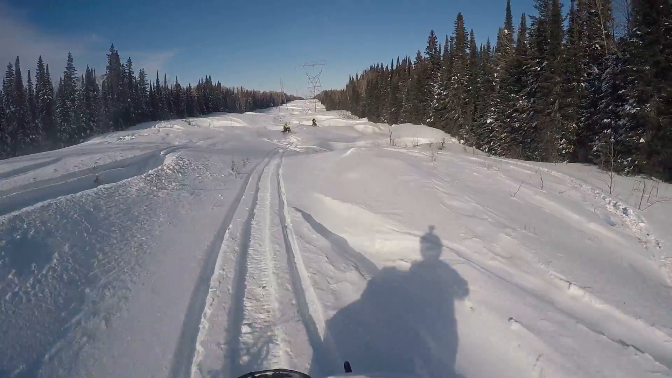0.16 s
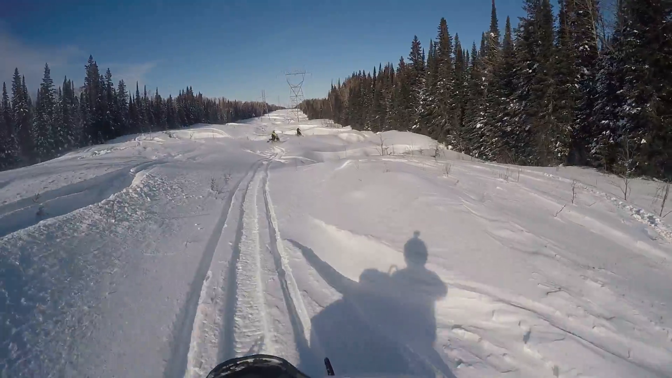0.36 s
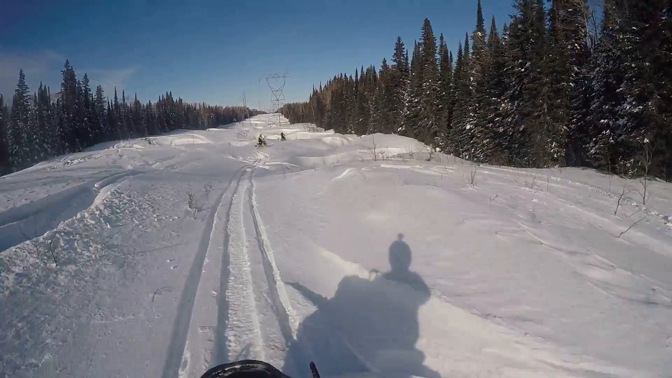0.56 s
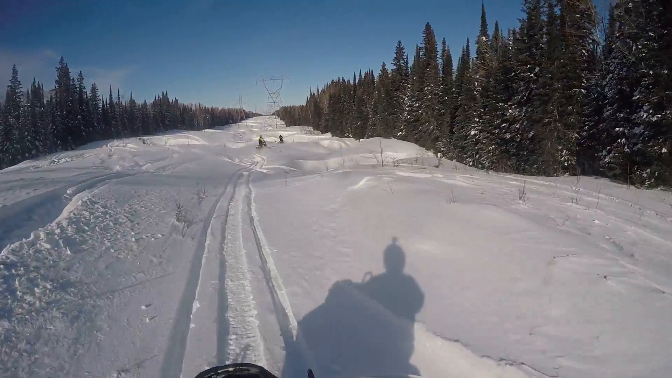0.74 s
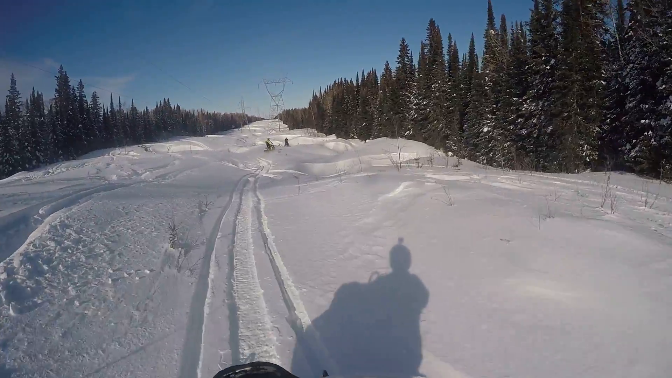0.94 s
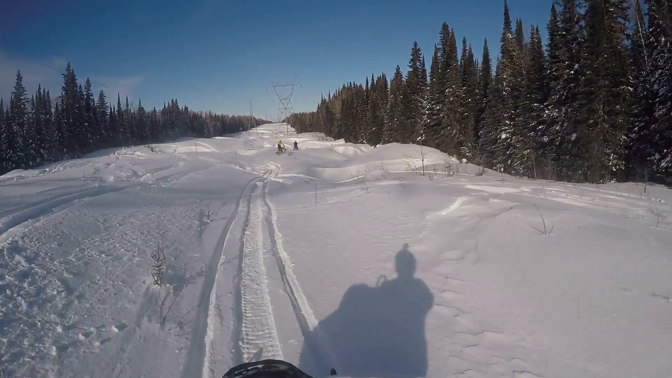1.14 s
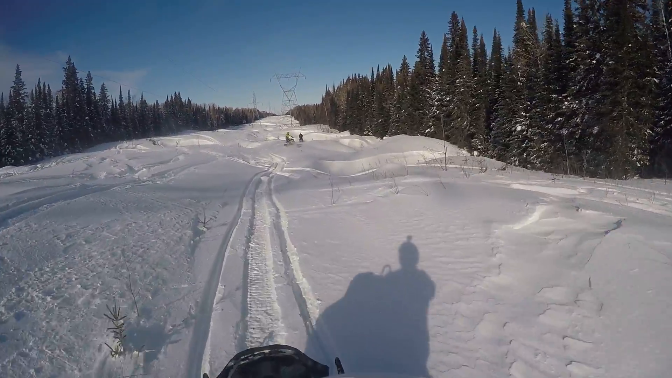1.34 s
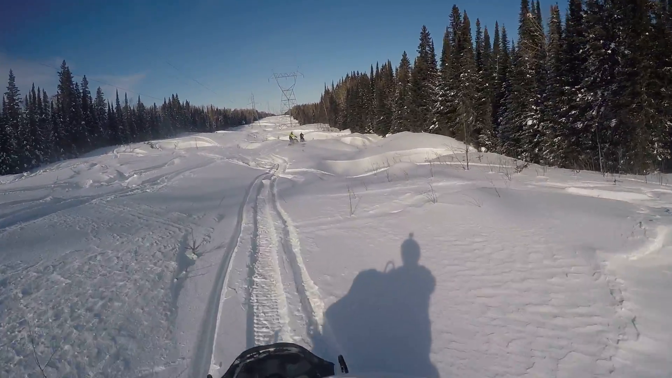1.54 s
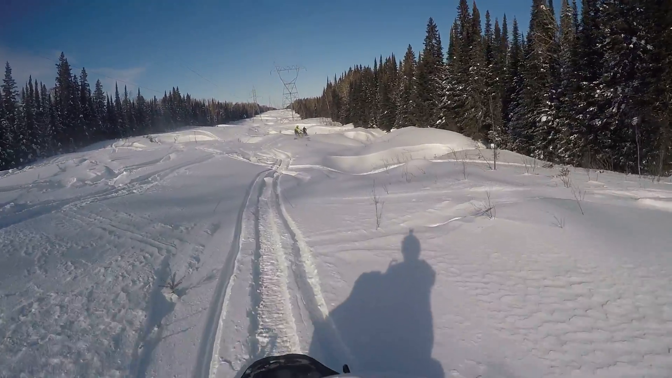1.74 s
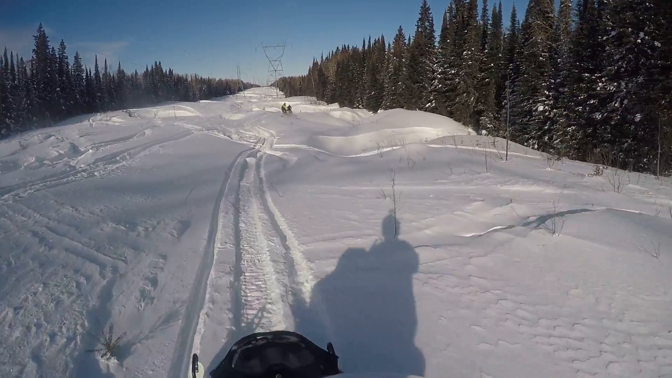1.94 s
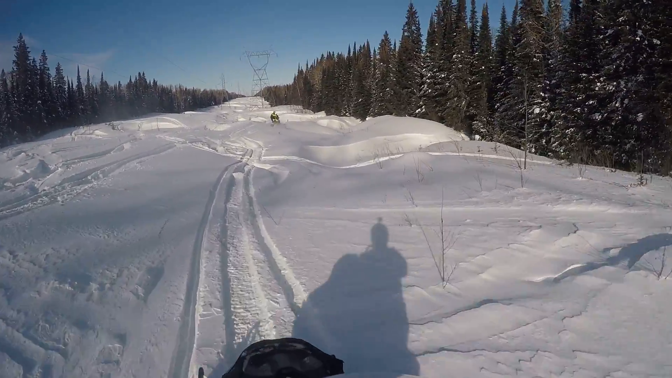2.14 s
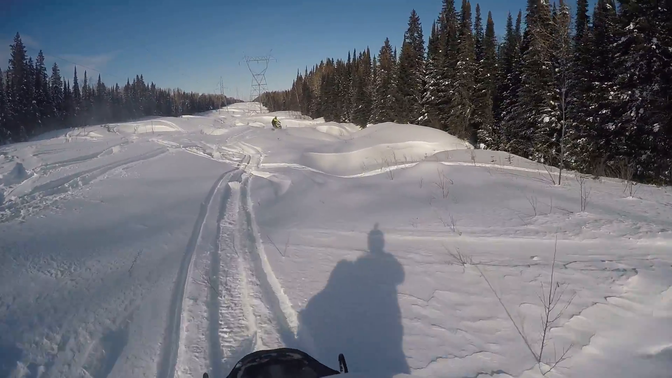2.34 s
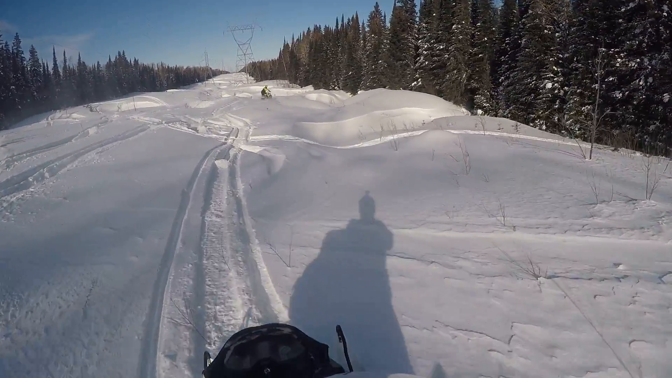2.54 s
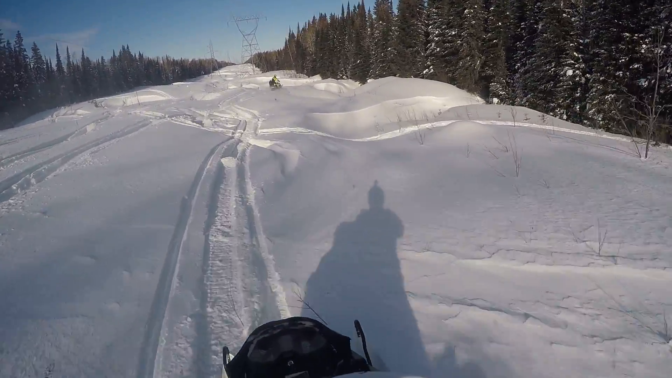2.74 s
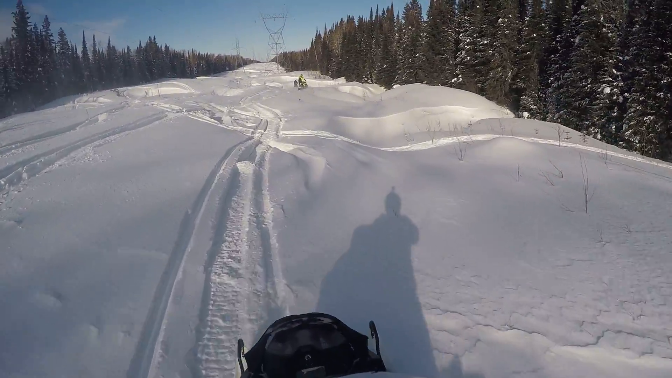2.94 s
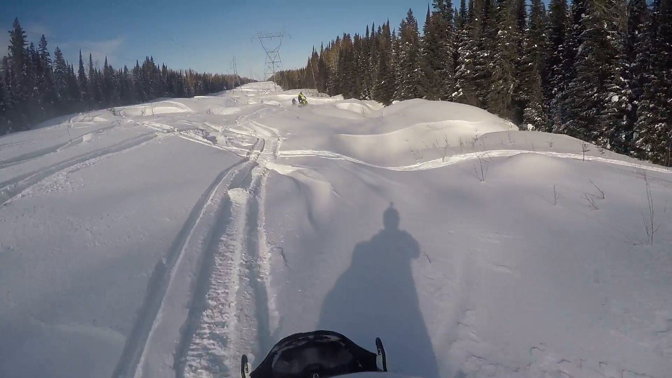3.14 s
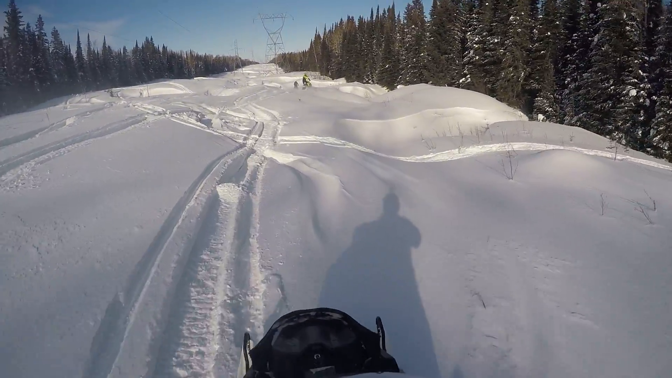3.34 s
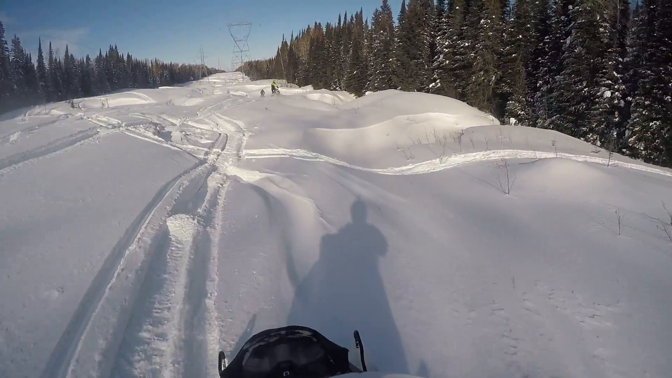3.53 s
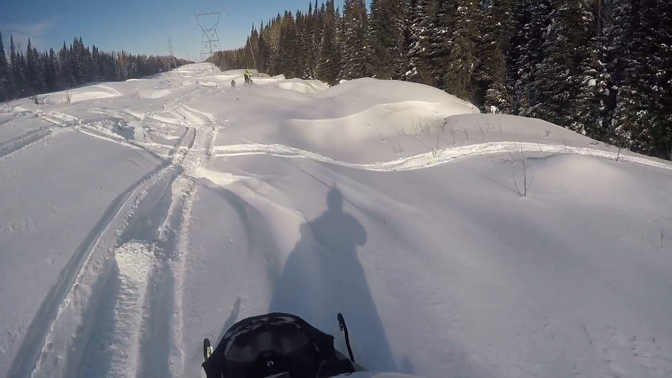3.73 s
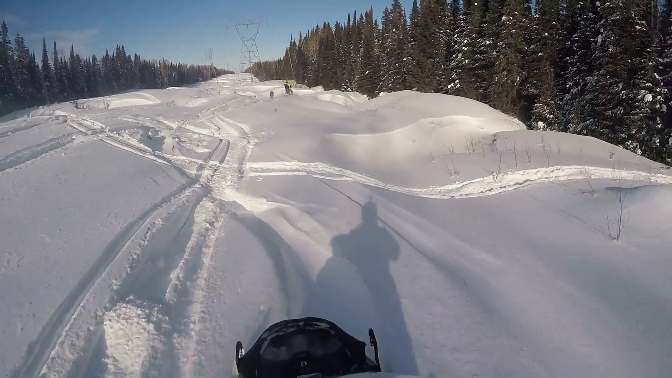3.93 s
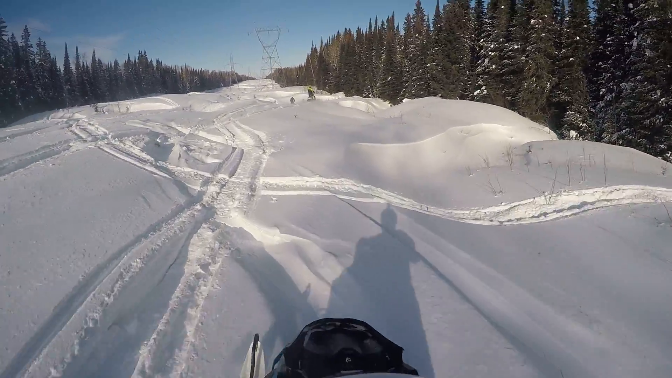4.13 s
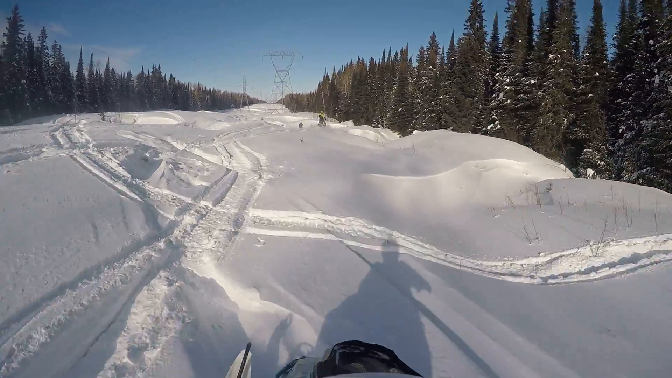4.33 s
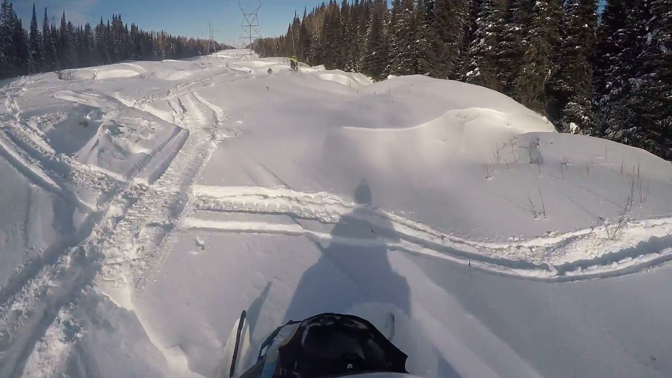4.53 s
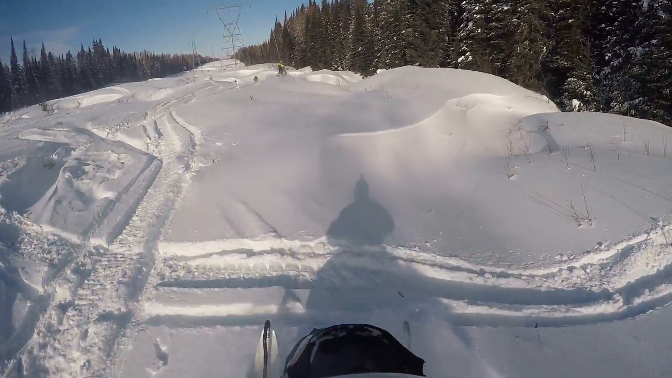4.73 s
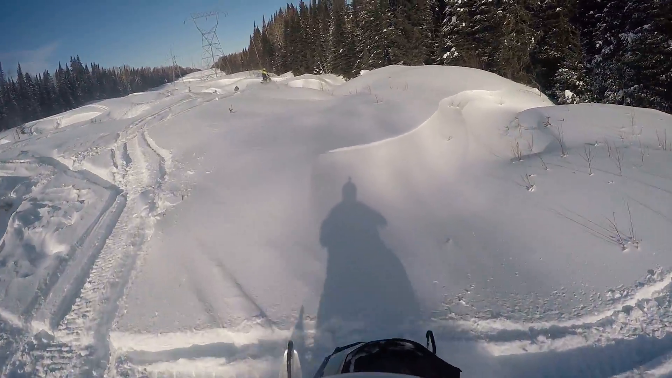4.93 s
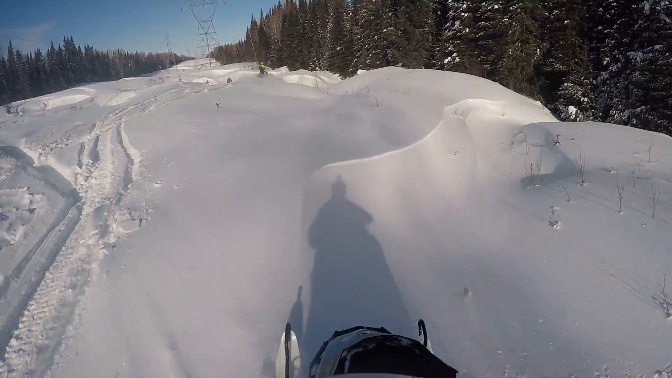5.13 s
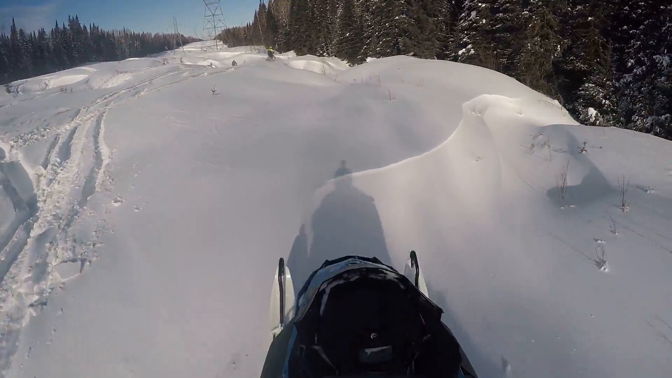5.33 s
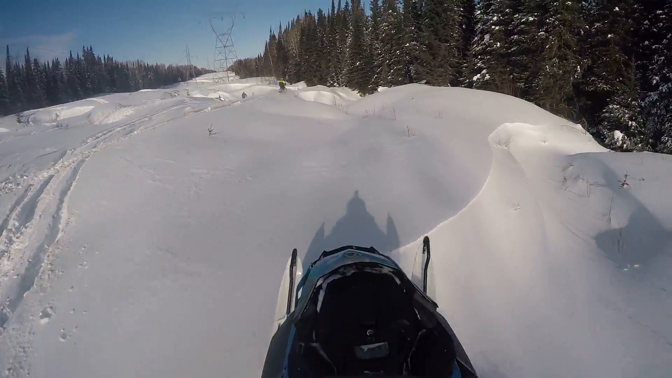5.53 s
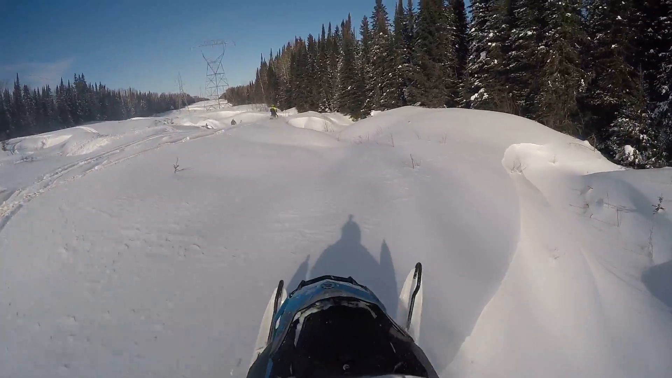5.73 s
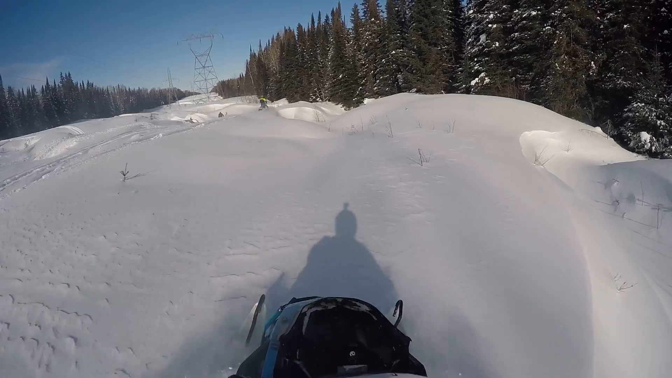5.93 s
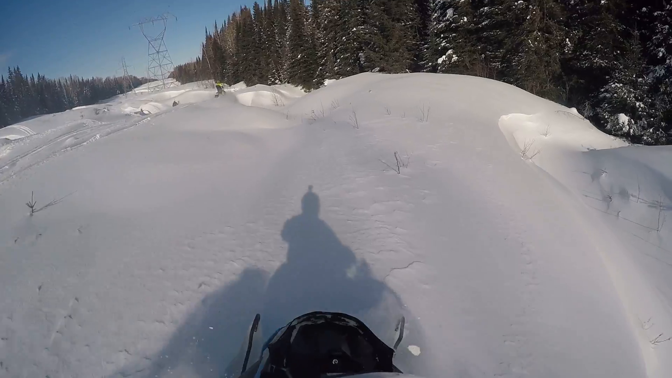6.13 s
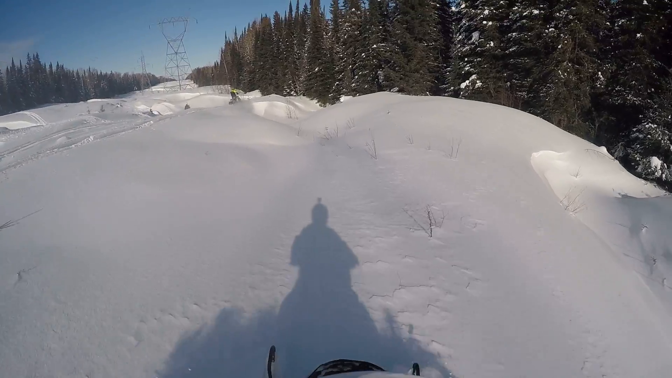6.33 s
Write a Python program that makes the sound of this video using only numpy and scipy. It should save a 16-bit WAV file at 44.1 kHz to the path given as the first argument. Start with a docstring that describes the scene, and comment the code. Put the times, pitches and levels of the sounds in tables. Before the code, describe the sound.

A rough, buzzing snowmobile engine starts mid-throttle, eases, then gives a run of quick barking blips with droning falls between them. Belt and snow hiss, rubber track hum and a loose, rattling hood surround it. A sharp knock comes before the big rev, which howls for under half a second and winds down. Dry outdoor sound from a microphone worn by the rider, buffeted by wind.

```python
"""Snowmobile in deep snow

Heard from the rider's seat, the engine answers short throttle bursts, then one hard rev.
Sine harmonics make the exhaust's boom, bark and howl; one pulse a firing makes its rasp and drone.
Pulses and noise shake the casing, sines make the track's hum, and decaying rings make the chassis ticks.
Filtered noise makes the belt and snow hiss, the wind on the microphone and a thin high fizz."""
import sys
import numpy as np
from scipy.fft import rfft, irfft, next_fast_len
from scipy.io import wavfile
from scipy.ndimage import uniform_filter1d, map_coordinates

SR = 44100
rng = np.random.default_rng(int(sys.argv[2]) if len(sys.argv) > 2 else 0)


def dump(signal):
    """Clip the signal to [-1, 1] and save it as 16-bit WAV at the path in sys.argv[1]."""
    limited = np.clip(np.atleast_2d(signal).T, -1, 1)
    pcm = np.round(limited * 32767).astype(np.int16)
    wavfile.write(sys.argv[1], SR, pcm)


N = 280916
TIME = np.arange(N) / SR

# squeezes of the throttle: (open [s], close [s], opening [0-1], speed limit [firings/s],
# climb [firings/s per s], coast time constant [s], added boom [dB], clatter lift [dB])
THROTTLE_BURSTS = [(0.029, 0.357, 0.42, 160, 160, 0.34, -29.5, 1),
                   (.49, .82, 0.23, 146.6, 35.4, 0.45, -34.5, 0.5),
                   (0.838, 1.464, 0.18, 144, 57.6, 0.49, -36.5, 1),
                   (1.848, 1.985, 0.4, 139.6, 192, .39, -30.5, 0.5),
                   (2.775, 2.92, 0.45, 134, 254, 0.4, -30.5, 2.5),
                   (3.188, 3.326, 0.41, 145.6, 285, 0.34, -30.5, 3.5),
                   (3.589, 3.787, 0.5, 160, 200, .27, -31, 2),
                   (3.917, 4.112, 0.51, 172, 245, 0.36, -31.5, 4),
                   (4.904, 5.418, 0.46, 270, 465, 0.31, -30.5, 5.5)]
START_HZ, IDLE_HZ = 120.38, 102.22  # firings a second
LEVEL_OFF_S = .019  # rounds off the top of each climb
OPEN_S, CLOSE_S = 0.016, 0.019  # time constants of the load as the throttle opens and closes
IDLE_LOAD = 0.022  # load (0-1) left at idle speed with the throttle shut
VALVE_HZ, VALVE_WIDTH_HZ = 203.7, 3.3  # firing rate where the exhaust valve opens and the engine takes full load
FULL_POWER_HZ = 241.1  # firing rate above which the level laws stop growing with speed

# how each engine layer grows with speed and load, before any fade in that layer's function:
# (level at idle [dB], growth with speed [dB per octave], growth from load 0 to 1 [dB])
# deep boom of the pipe, same columns
BOOM_LEVELS = (-49, 9.4, 12.9)
# bark of the pipe, same columns
BARK_LEVELS = (-47, 6, 26.7)
# rasp of the outlet, same columns
RASP_LEVELS = (-53, 15.4, 6.4)
# clatter of the casing, same columns
CASING_LEVELS = (-41.5, 10.95, 7.1)
# hiss of belt and snow, same columns
HISS_LEVELS = (-58, 11.03, 9.16)

# firing rates where the pipe cancels part of the boom: (centre [firings/s], half width [firings/s], lift [dB])
BOOM_CANCEL = (218, 20, -7)
# where the bark rings in sympathy: (centre [firings/s], half width [firings/s], lift [dB])
BARK_SYMPATHY = (157, 12, 5.5)
# where the third harmonic rings in sympathy: (centre [firings/s], half width [firings/s], lift [dB])
THIRD_SYMPATHY = (147, 17, 9.5)
SECOND_DB = -15  # second harmonic of the boom against the first
THIRD_BASE_DB = -54.5  # third harmonic before load and sympathy lift it
# the pipe's bark at part throttle: (frequency [Hz], relative level [dB])
BARK_SPECTRUM = [(520, -11.5), (680, -16), (810, -20), (930, 0.5), (1090, -2), (1230, 4.5), (1300, -9.5),
                 (1480, -21), (1850, -17), (2080, -3), (2300, -42)]
# the howl's harmonics at full load: (frequency [Hz], level [dB])
HOWL_SPECTRUM = [(400, -33), (490, -35), (540, -28.5), (610, -41), (720, -27.5), (810, -25.5), (865, -22),
                 (950, -27), (1100, -24.5), (1230, -26), (1355, -24.5), (1480, -41), (1620, -36),
                 (1750, -31), (1890, -39), (2150, -29), (2350, -22), (2460, -30), (2700, -39)]
# rasp of the outlet towards full load: (frequency [Hz], relative level [dB])
RASP_SPECTRUM = [(1300, -39), (1750, -11), (2000, -15), (2300, -8), (2700, -15), (3050, -23), (3270, -12),
                 (3550, -14), (4000, -19), (4350, -11), (4900, -20), (5400, -33), (6500, -19), (9000, -53)]
# the pipe's drone while the engine slows: (frequency [Hz], relative level [dB])
DRONE_SPECTRUM = [(115, 5.5), (200, -14.5), (300, -2.5), (400, 0), (560, -9.5), (740, -10.5), (880, -3.5),
                  (1020, -9.5), (1230, 0), (1500, -28), (1750, -5.5), (1900, 2.5), (2100, 0.5),
                  (2350, -14.5)]
DRONE_IDLE_DB, DRONE_DB_PER_OCTAVE = -49.5, 15  # level at idle speed and growth with speed
SHIMMER_DB, SHIMMER_RATE = 2.6, 24  # random spread (dB) of each bark or howl harmonic, and knots a second

# resonances of engine casing and hood: (centre [Hz], width of one filter pass [Hz], relative level [dB])
CASING_MODES = [(396, 330, -15.5), (893, 106, -5.5), (1155.4, 204, -0.5), (1278.5, 151, 2.5),
                (1903, 297, -7), (2171, 177, -2), (2700, 370, -22.5)]
# rush of intake and running gear: (frequency [Hz], relative level [dB per Hz])
RUSH_SPECTRUM = [(50, -28.5), (100, 7), (180, -1), (260, -1.5), (400, -5.5), (560, -11), (1000, -3),
                 (2300, -15.5), (3100, -31.5), (5000, -52.5)]
# hiss of drive belt and sprayed snow: (frequency [Hz], relative level [dB per Hz])
HISS_SPECTRUM = [(2300, 10.5), (2900, -2), (3900, 1.5), (4700, -4), (5300, -11), (5900, -12), (6600, -1.5),
                 (7300, -10.5), (8500, -9.5), (8900, -14.5), (10400, -13.5), (12500, -25), (15000, -31)]
# roughness of the snow under the machine: (time [s], hiss lift [dB])
SNOW_ROUGHNESS = [(0, 2.5), (1.4, 0.5), (2.2, 2.5), (2.7, 0), (3.5, 1.5), (4.2, 0.5), (4.6, 6), (4.85, 0.5),
                  (5.08, 2), (5.2, 6.5), (5.55, 7), (5.9, 3), (6.15, 1), (6.37, 3)]
ROUGH_CLATTER = 0.51  # share of those dB that reaches the casing

# the track: (time [s], lug rate [lugs/s], second harmonic [dB], third and fourth harmonics [dB])
TRACK_MOTION = [(0, 101, -40, -52), (.3, 100, -51, -60), (.55, 100, -46, -51.5), (1.4, 98, -45.5, -49.5),
                (2.3, 89, -42, -57), (2.7, 79.8, -47.5, -54.5), (4.4, 91, -43, -56.5),
                (5.0, 87.7, -49, -56), (5.5, 100.6, -42, -40), (5.8, 84, -47, -46.5), (6.37, 84, -52, -62)]
HUM_AT_HZ, HUM_DB, HUM_DB_PER_HZ = 88.2, -50, 0.9  # a lug rate, the hum's level there, growth with lug rate

# chassis ticks: (time [s], level [dB], brightness [dB per octave])
TICK_EVENTS = [(.818, -41, 4), (.847, -44, 6), (1.222, -35, -2), (1.641, -47, 5), (2.041, -46, 5),
               (3.204, -31, -6), (3.338, -46, 6), (3.445, -44, 4), (4.269, -39, 4), (4.4875, -21.5, .5),
               (4.696, -46, 7), (5.469, -16, -2.5), (5.961, -40, 3)]
# rings of the hood: (frequency [Hz], relative level [dB], time to fall 60 dB [s])
HOOD_MODES = [(390, -16, .03), (780, -7, .014), (930, -2, .016), (1440, -5, .015), (2270, 0, .014),
              (2660, -1, .012), (3250, -11, .01), (4500, -16, .009), (6800, -24, .007), (9900, -21, .006)]

# steady headwind: (time [s], level [dB])
HEADWIND = [(0, -35), (1.3, -34.5), (1.9, -36.5), (3.7, -35.5), (4.6, -30), (5.5, -26), (6.37, -31)]
# gusts on the microphone: (time [s], half length [s], level [dB])
WIND_GUSTS = [(0.455, 0.022, -25), (0.62, 0.068, -30), (1.063, 0.045, -27.5), (2.497, 0.017, -31),
              (3.21, .02, -30.5), (4.403, 0.014, -18.5), (5.425, 0.038, -26), (5.799, 0.038, -22),
              (6.08, 0.056, -25.5), (6.303, 0.024, -21.5)]
# colour of the wind: (frequency [Hz], relative level [dB per Hz])
WIND_SPECTRUM = [(12, -5), (25, 5), (42, 0.5), (53, 7.5), (64, -16), (80, -14), (130, -19.5)]

# when the high fizz sounds: (start [s], end [s], level [dB])
FIZZ_SPANS = [(-.1, 0.3, -55), (3.371, 5.406, -54)]
# colour of the fizz: (frequency [Hz], relative level [dB])
FIZZ_SPECTRUM = [(9000, -69), (10200, -16), (12600, -21), (13050, -13), (13600, 3), (14200, -4),
                 (15200, -25)]
TOP_HZ = 15300  # nothing sounds above this


def engine_speed():
    """Firings a second: each burst climbs steadily towards its limit, then coasts back towards idle."""
    hz = np.full(N, float(START_HZ))
    for start, end, _, limit, climb, coast_s, _, _ in THROTTLE_BURSTS:
        ramp = np.interp(start, TIME, hz) + climb * (TIME - start)
        knee = climb * LEVEL_OFF_S
        rounded = limit - knee * np.logaddexp(0, (limit - ramp) / knee)
        hz = np.where(TIME > start, rounded, hz)
        fall = np.exp(-np.maximum(TIME - end, 0) / coast_s)
        coast = IDLE_HZ + (np.interp(end, TIME, hz) - IDLE_HZ) * fall
        hz = np.where(TIME > end, coast, hz)
    return hz


def throttle(firing_hz):
    """Load (0-1), added boom (gain) and clatter lift (dB): each squeeze opens, holds and lets go."""
    valve = .5 + .5 * np.tanh((firing_hz - VALVE_HZ) / (2 * VALVE_WIDTH_HZ))
    load, push, lift_db = np.zeros((3, N))
    for start, end, opening, _, _, _, boom_db, clatter_db in THROTTLE_BURSTS:
        opened = 1 - np.exp(-np.maximum(TIME - start, 0) / OPEN_S)
        held = opened * np.exp(-np.maximum(TIME - end, 0) / CLOSE_S)
        load += held * (opening + (1 - opening) * valve)
        push += held * amp(boom_db)
        lift_db += held ** 2 * clatter_db
    # a fast engine keeps pumping with the throttle shut
    pumping = IDLE_LOAD * (firing_hz / IDLE_HZ) ** 2.5
    return np.clip(np.maximum(load, pumping), 0, 1), push, lift_db


def boom(cycles, firing_hz, load, push):
    """The pipe's deep firing tone and its first two overtones, as three wavering sines."""
    turn = 2 * np.pi * cycles
    strength = np.hypot(amp(level(BOOM_LEVELS, firing_hz, load ** 3)), push)
    first_db = 20 * np.log10(strength) + sympathy(BOOM_CANCEL, firing_hz)
    third_ring_db = sympathy(THIRD_SYMPATHY, firing_hz) * np.clip(.4 + 3 * load, 0, 1)
    third_db = THIRD_BASE_DB + third_ring_db + 6 * load
    first = amp(first_db + 1.4 * wobble(45)) * np.sin(turn)
    second = amp(first_db + SECOND_DB + 2.2 * wobble(18)) * np.sin(2 * turn)
    third = amp(third_db + 1.4 * wobble(20)) * np.sin(3 * turn)
    return np.sqrt(2) * (first + second + third)


def exhaust(cycles, firing_hz, load):
    """The pipe barks at part throttle, howls and rasps at full load, and drones as the engine slows."""
    full = np.clip(2 * load - 1, 0, 1)
    howl = full * partials(cycles + .005 * wobble(90), firing_hz, HOWL_SPECTRUM, order=2)
    return bark(cycles, firing_hz, load, full) + howl + rasp(cycles, firing_hz, load) + drone(cycles, firing_hz)


def bark(cycles, firing_hz, load, full):
    """Upper firing harmonics ring the pipe; the bark grows with load, then gives way near full load."""
    bark_db = level(BARK_LEVELS, firing_hz, load) + sympathy(BARK_SYMPATHY, firing_hz)
    fade = load ** 0.62 * (1 - full) ** 2
    return amp(bark_db) * fade * steady(partials(cycles, firing_hz, BARK_SPECTRUM, order=4))


def rasp(cycles, firing_hz, load):
    """The outlet flutters, so its smeared firing pulses waver in phase and strength."""
    flutter = firings(cycles + .002 * wobble(70), scatter_db=1.1, jitter_s=.000003, uneven_db=3)
    outlet = steady(coloured(bay(flutter, t60=.04, ripple=.4), RASP_SPECTRUM))
    rasp_db = level(RASP_LEVELS, firing_hz, load ** 3) + 2.0 * wobble(35)
    return amp(rasp_db) * load ** 3 * outlet


def drone(cycles, firing_hz):
    """While the engine slows, loosely timed pumping pulses sound through the pipe."""
    pulses = firings(cycles + .012 * wobble(40), scatter_db=2.5, jitter_s=.00005, uneven_db=4)
    pumping = bay(pulses, t60=.02, ripple=0)
    slowing = uniform_filter1d((np.gradient(firing_hz) < 0) * 1., size=2000)
    drone_db = DRONE_IDLE_DB + DRONE_DB_PER_OCTAVE * np.log2(firing_hz / IDLE_HZ)
    return amp(drone_db) * slowing * steady(coloured(pumping, DRONE_SPECTRUM))


def casing(cycles, firing_hz, load, lift_db):
    """Firing knocks and gritty noise ring the casing, over the intake's rush and the hiss of belt and snow."""
    loose = cycles + (.017 - .007 * load) * wobble(50)
    knocks = bay(firings(loose, scatter_db=2.6, jitter_s=.00004, uneven_db=2.5), t60=.05, ripple=.15)
    shaking = knocks + .75 * puffs(cycles / 2, depth=.3)
    clatter = np.zeros(N)
    for k, mode in enumerate(CASING_MODES):
        # each panel swells and fades on its own as the chassis flexes
        clatter += ringing(shaking, *mode) * (-1) ** k * amp(2 * wobble(9))
    rush = unit(coloured(puffs(cycles, depth=0.32), RUSH_SPECTRUM))
    spray = puffs(cycles, depth=0.1) * amp(1.46 * wobble(70))
    hiss = unit(coloured(spray + 0.25 * knocks, HISS_SPECTRUM))

    rough_db, = curves(SNOW_ROUGHNESS)
    casing_db = level(CASING_LEVELS, firing_hz, load ** 3) + lift_db
    casing_db += ROUGH_CLATTER * rough_db + .5 * wobble(12)
    hiss_db = level(HISS_LEVELS, firing_hz, load ** 3) + 0.66 * lift_db
    hiss_db += rough_db + .5 * wobble(8.9)
    # under full load the exhaust carries most of the sound
    share = amp(-10.5 * load ** 3)
    body = amp(casing_db) * share * (steady(clatter) + amp(-5.0) * rush)
    return body + amp(hiss_db) * share ** .65 * hiss


def track():
    """Rubber lugs slap over the drive wheels at an unsteady rate; the hum's lowest tone grows with speed."""
    lug_hz, second_db, upper_db = curves(TRACK_MOTION)
    turn = 2 * np.pi * np.cumsum(lug_hz * (1 + .012 * wobble(20))) / SR
    hum_db = HUM_DB + HUM_DB_PER_HZ * (lug_hz - HUM_AT_HZ)
    hum = amp(hum_db + 3 * wobble(20)) * np.sin(turn)
    hum += amp(second_db + 3 * wobble(12)) * np.sin(2 * turn)
    for k in (3, 4):
        hum += amp(upper_db + 3 * wobble(12)) * np.sin(k * turn)
    return hum


def ticks():
    """Loose parts snap against the hood over the bumps and ring it briefly, each with its own brightness."""
    out = np.zeros(N)
    t = np.arange(SR // 20) / SR
    for start, db, bright_db in TICK_EVENTS:
        ring = np.zeros(len(t))
        for hz, mode_db, t60 in HOOD_MODES:
            ring_db = mode_db + bright_db * np.log2(hz / 2000) - 60 * t / t60
            ring += amp(ring_db) * np.sin(2 * np.pi * (hz * t + rng.random()))
        crack = amp(2 * bright_db - 17 - 60 * t / .005) * rng.standard_normal(len(t))
        attack = 1 - np.exp(-t / .0003)
        out[round(start * SR):][:len(t)] += amp(db) * attack * (ring + crack)
    return out


def wind():
    """Lumps of air strike the microphone: a restless headwind with single gusts on top."""
    wind_db, = curves(HEADWIND)
    power = amp(wind_db + 0.72 * wobble(8)) ** 2
    for centre, half_length, db in WIND_GUSTS:
        power += amp(db) ** 2 * bump(TIME, centre, half_length)
    return np.sqrt(power) * steady(coloured(noise(), WIND_SPECTRUM))


def fizz():
    """A thin, very high hiss, chopped sixty times a second, switches on and off."""
    on = sum(amp(db) * ((TIME > start) & (TIME < end)) for start, end, db in FIZZ_SPANS)
    swing = np.tanh(3 * np.sin(2 * np.pi * 60 * TIME) + 2.2 * wobble(90))
    chop = amp(7 * swing + 1.2 * wobble(14))
    return uniform_filter1d(on, size=800) * unit(coloured(noise() * chop, FIZZ_SPECTRUM))


def level(law, firing_hz, load):
    """A layer's dB: louder with speed and with load."""
    idle_db, octave_db, load_db = law
    octaves = np.log2(np.minimum(firing_hz, FULL_POWER_HZ) / IDLE_HZ)
    return idle_db + octave_db * octaves + load_db * load


def sympathy(ring, firing_hz):
    """The dB gained or lost as the engine sweeps through a resonance of the pipe."""
    hz, width, db = ring
    return db * bump(firing_hz, hz, width)


def partials(cycles, firing_hz, spectrum, order):
    """Clean harmonics from this order up glide through the spectrum; each waxes and wanes on its own."""
    f, db = np.transpose(spectrum)
    out = np.zeros(N)
    for k in range(order, order * 3 + 5):
        level_db = np.interp(k * firing_hz, np.r_[f, f[-1] * 1.1], np.r_[db, db[-1] - 40])
        gain = amp(level_db + SHIMMER_DB * wobble(SHIMMER_RATE))
        out += gain * np.sin(2 * np.pi * (k * cycles + rng.random()))
    return np.sqrt(2) * out


def firings(cycles, scatter_db, jitter_s, uneven_db):
    """One pulse a firing, each a little off in size and time; the two cylinders differ in strength."""
    k = np.arange(1, int(cycles[-1]))
    chance = rng.standard_normal((len(k), 2))
    at = np.interp(k, cycles, np.arange(N)) + jitter_s * SR * chance[:, 0]
    at = np.clip(at, 0, N - 2)
    size = amp(scatter_db * chance[:, 1] + uneven_db * (-1) ** k)
    # a pulse between two samples is shared by both
    whole, part = at.astype(int), at % 1
    return np.bincount(whole, size * (1 - part), N) + np.bincount(whole + 1, size * part, N)


def puffs(cycles, depth):
    """Noise that swells once a cycle."""
    return unit(noise() * np.exp(depth * np.cos(2 * np.pi * cycles)))


def bay(x, t60, ripple):
    """Many reflections under the hood smear each pulse; ripple sets how uneven the spectrum becomes."""
    t = np.arange(SR // 10) / SR
    echoes = rng.standard_normal(len(t)) * amp(-60 * t / t60)

    def response(hz):
        h = rfft(echoes, 2 * len(hz) - 2)
        return h / np.abs(h) ** (1 - ripple)
    return unit(filtered(x, response))


def ringing(x, hz, width, db):
    """x through one steep-sided resonance: the same filter twice."""
    def response(f):
        once = 1j * f * width / (hz * hz - f * f + 1j * f * width)
        return amp(db) * once ** 2
    return filtered(x, response)


def coloured(x, points):
    """x through the causal filter with these (Hz, dB) points; it falls away steeply outside them."""
    f, db = np.transpose(points)
    corners = np.log(np.r_[f[0] / 2, f, f[-1] * 2])
    corner_db = np.r_[db[0] - 40, db, db[-1] - 70]

    def response(hz):
        gain = amp(np.interp(np.log(hz + 1), corners, corner_db))
        # folding the cepstrum makes the filter answer only after each sound
        cepstrum = irfft(np.log(gain))
        cepstrum[1:len(hz) - 1] *= 2
        cepstrum[len(hz):] = 0
        return np.exp(rfft(cepstrum))
    return filtered(x, response)


def filtered(x, response):
    """x times a complex response of frequency, padded so the tail does not wrap round."""
    m = 2 * next_fast_len(N // 2 + SR // 8)
    return irfft(rfft(x, m) * response(np.fft.rfftfreq(m, 1 / SR)), m)[:N]


def noise():
    """Fresh white noise."""
    return rng.standard_normal(N)


def wobble(rate):
    """A smooth random curve, rate knots a second."""
    knots = rng.standard_normal(int(N * rate / SR) + 4)
    return map_coordinates(knots, [TIME * rate], mode="nearest")


def curves(rows):
    """One value per sample for each column after the time."""
    s, *cols = np.transpose(rows)
    return [np.interp(TIME, s, c) for c in cols]


def bump(x, centre, width):
    """A bell curve of height 1."""
    return np.exp(-((x - centre) / width) ** 2)


def amp(db):
    """Decibels to gain."""
    return 10 ** (np.asarray(db) / 20)


def unit(x):
    """x at rms (average strength) 1."""
    return x / np.sqrt(np.mean(x ** 2) + 1e-20)


def steady(x):
    """x at rms 1 from moment to moment."""
    return x / np.sqrt(np.abs(uniform_filter1d(x ** 2, size=3000)) + 1e-12)


def scene():
    """The throttle drives the engine's speed and load; these time every firing and set how hard it barks."""
    firing_hz = engine_speed()
    load, push, lift_db = throttle(firing_hz)
    cycles = np.cumsum(firing_hz * (1 + .002 * wobble(40))) / SR
    engine = boom(cycles, firing_hz, load, push) + exhaust(cycles, firing_hz, load)
    engine += casing(cycles, firing_hz, load, lift_db)
    return (engine + track() + ticks() + wind() + fizz())[None]


def record(dry):
    """Cuts off everything from the top frequency upwards."""
    return filtered(dry[0], lambda hz: hz < TOP_HZ)[None]


dry = scene()
out = record(dry)
dump(out)
```